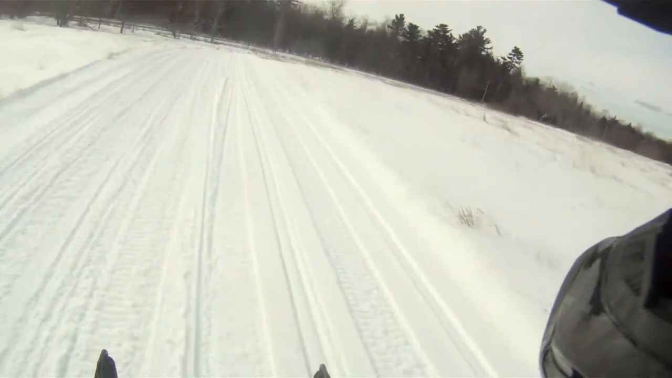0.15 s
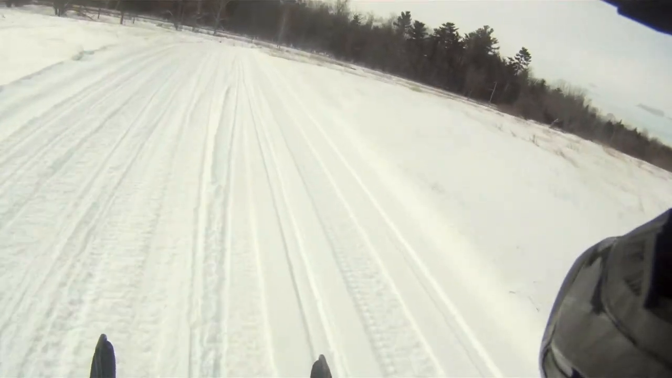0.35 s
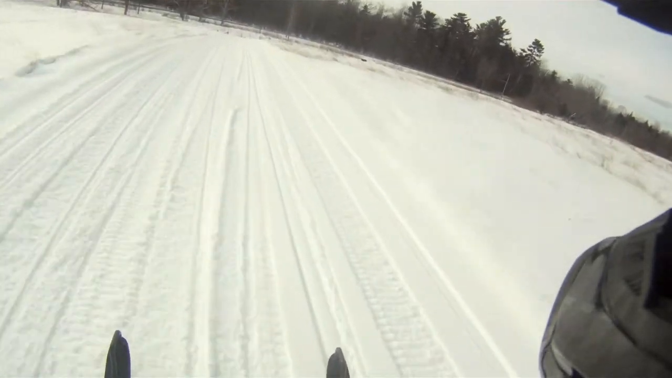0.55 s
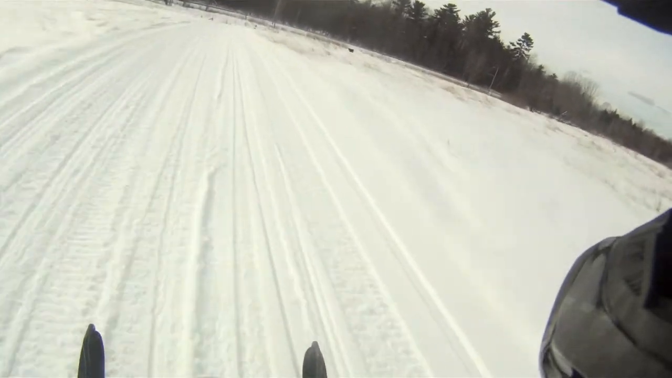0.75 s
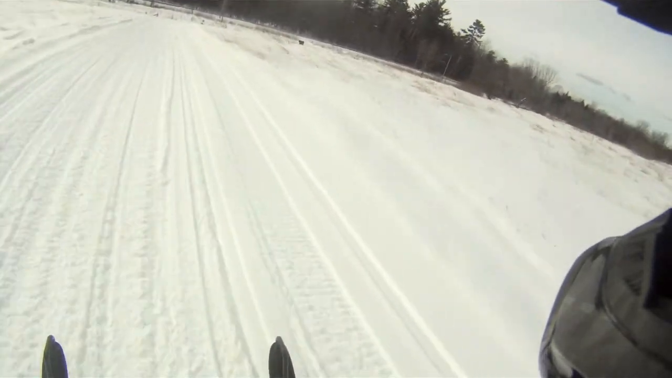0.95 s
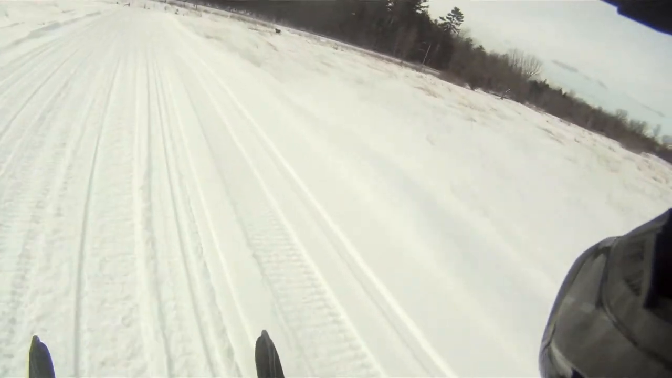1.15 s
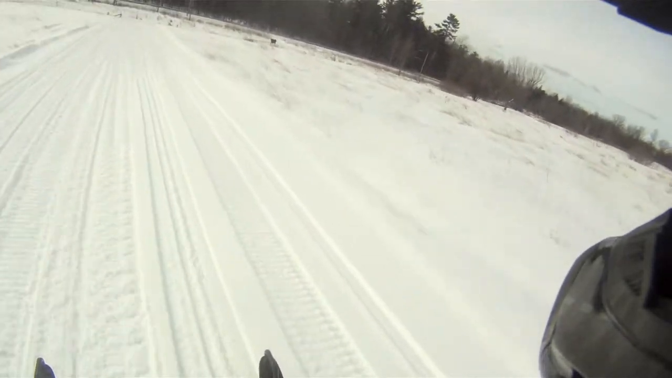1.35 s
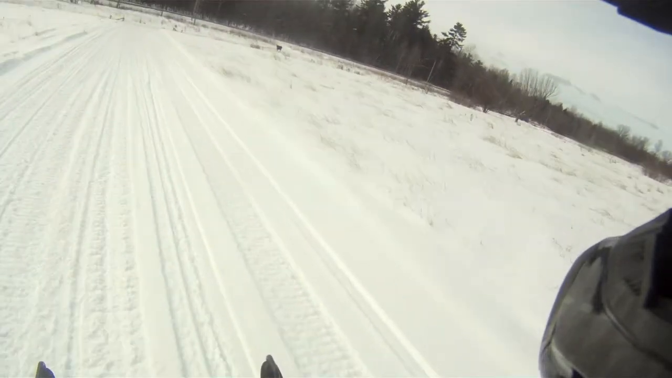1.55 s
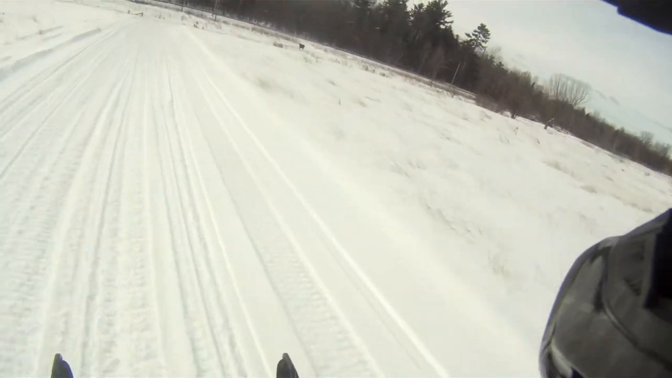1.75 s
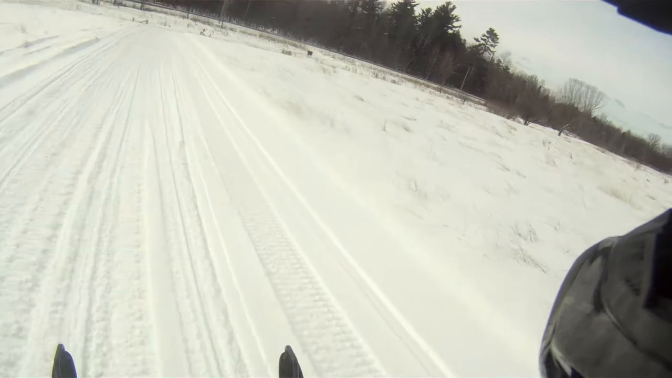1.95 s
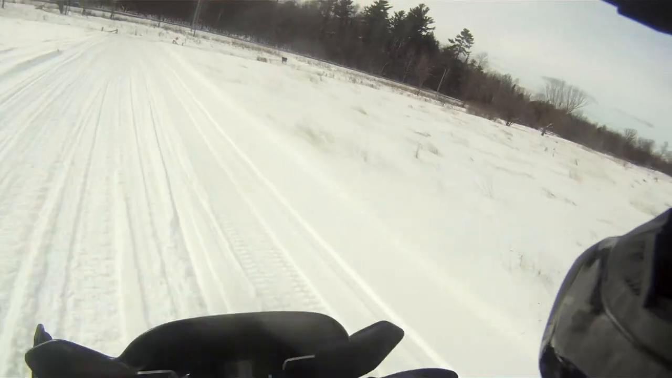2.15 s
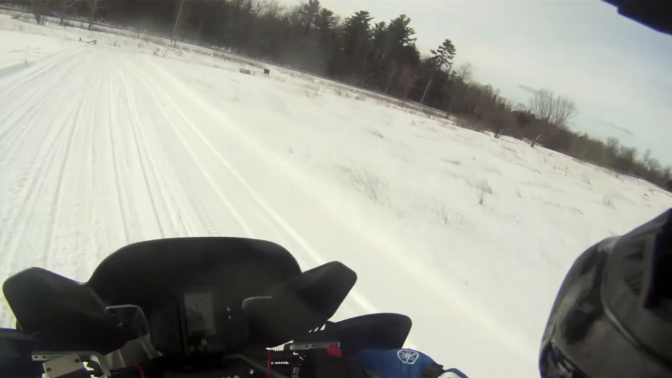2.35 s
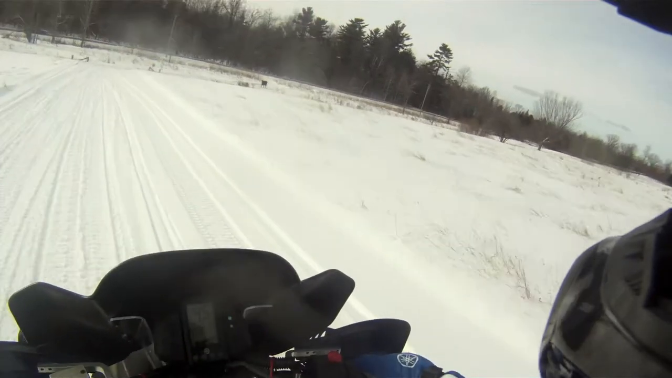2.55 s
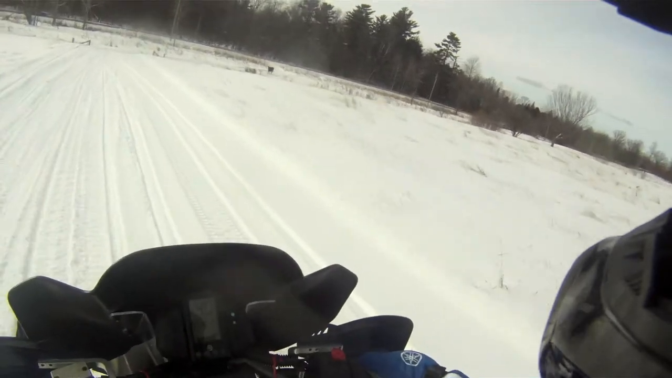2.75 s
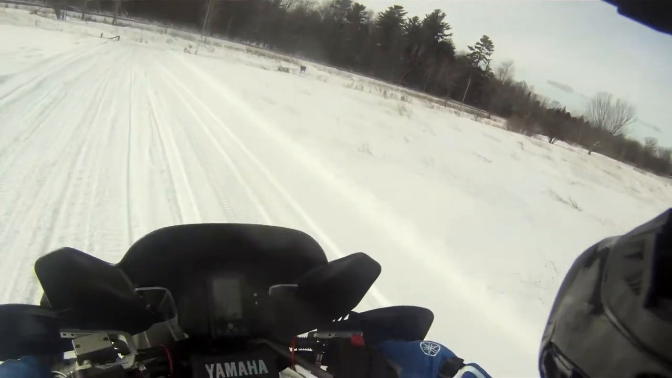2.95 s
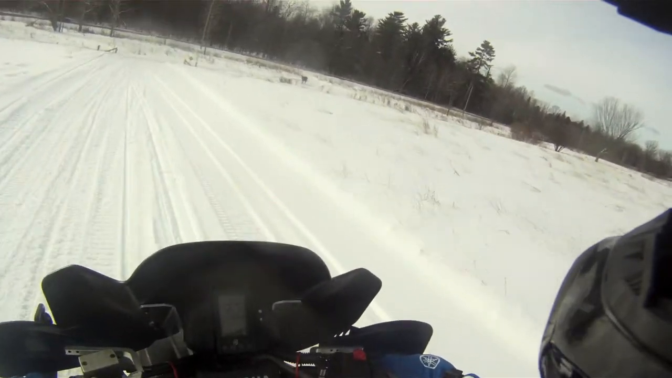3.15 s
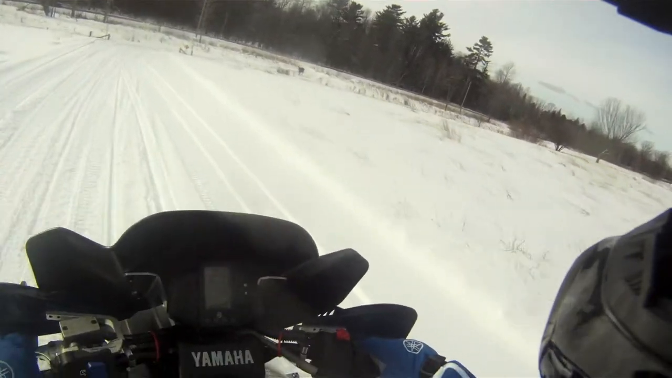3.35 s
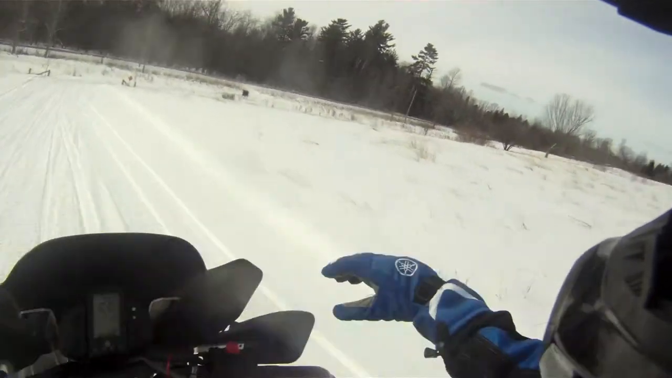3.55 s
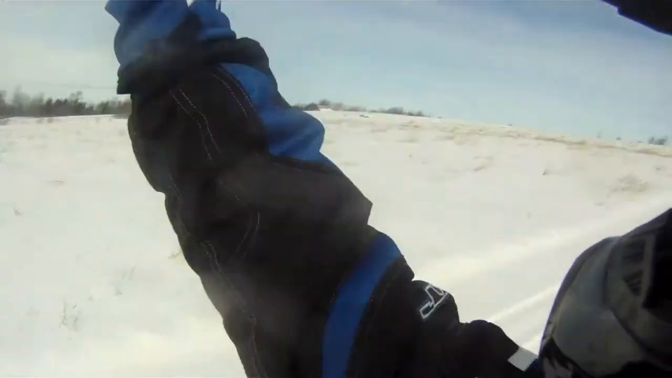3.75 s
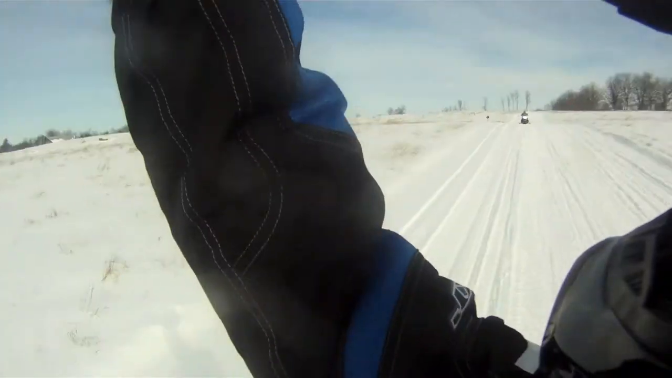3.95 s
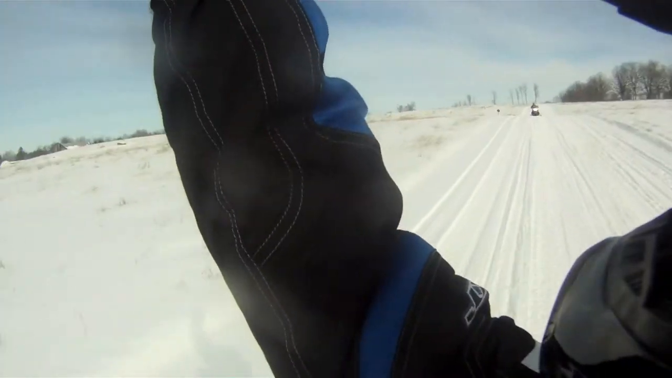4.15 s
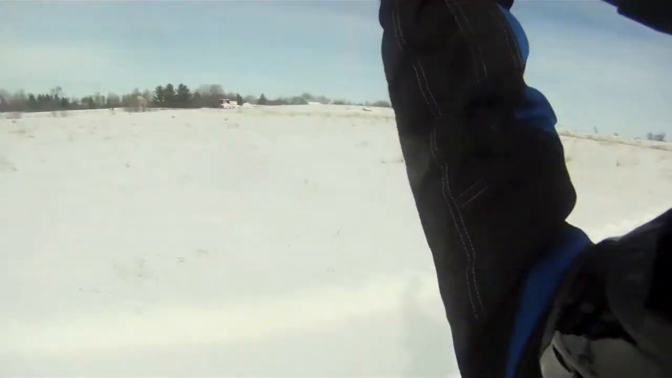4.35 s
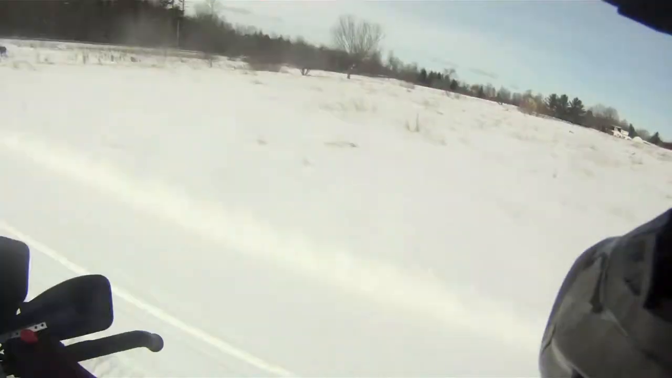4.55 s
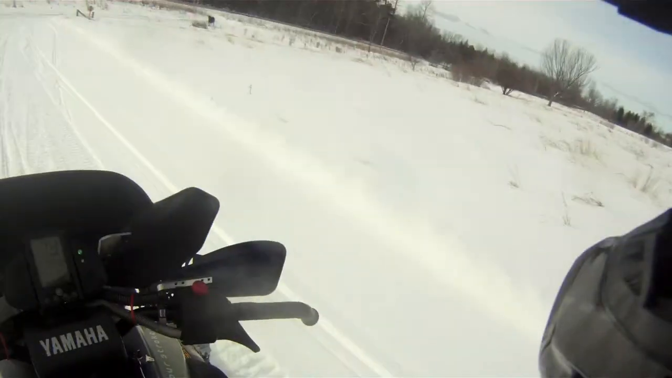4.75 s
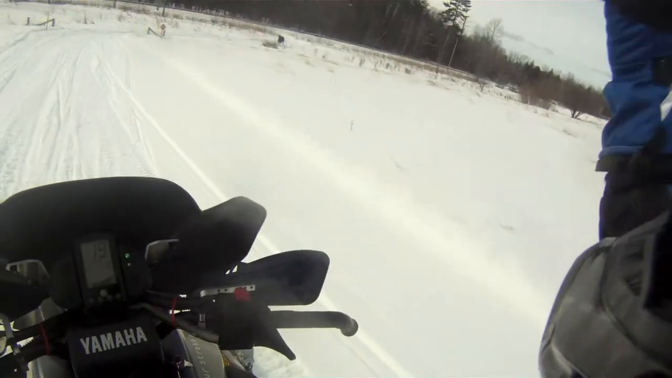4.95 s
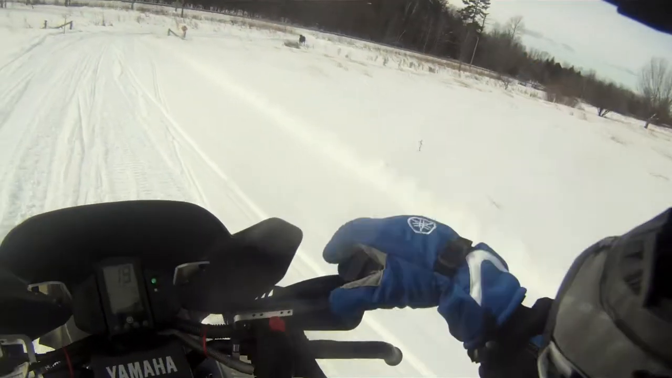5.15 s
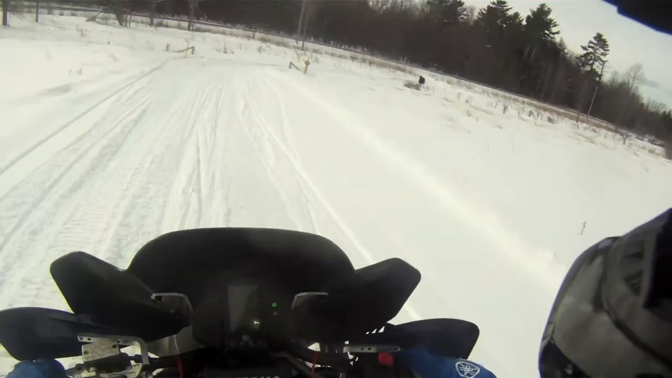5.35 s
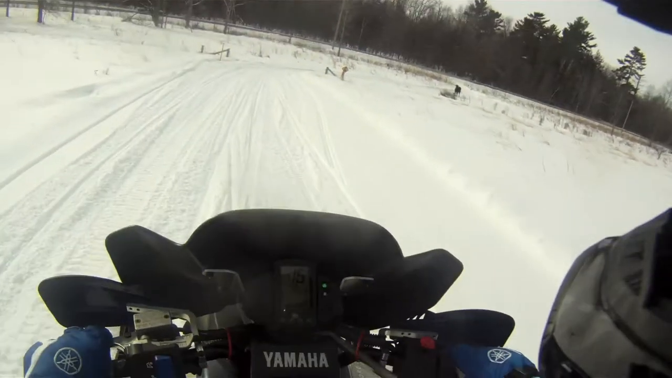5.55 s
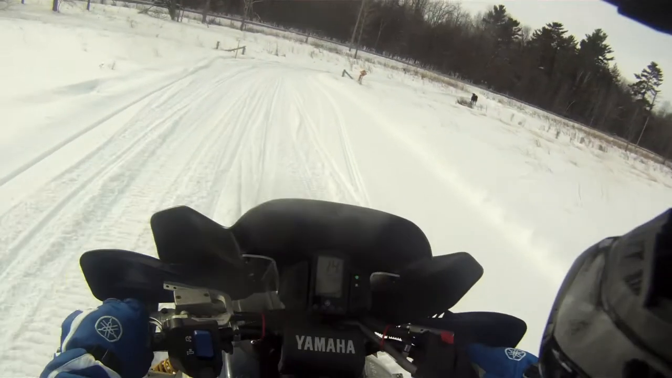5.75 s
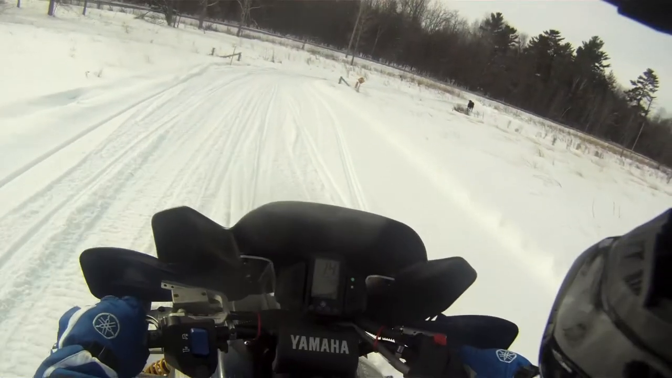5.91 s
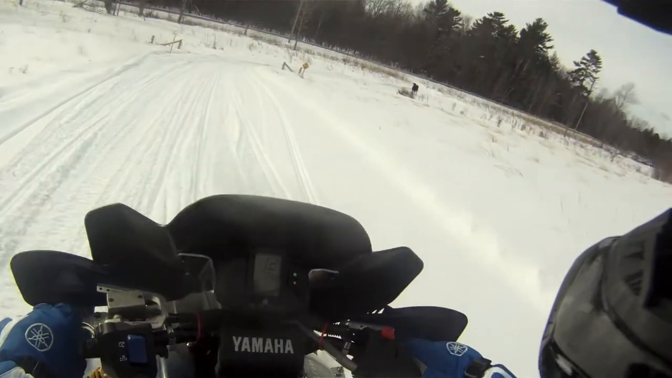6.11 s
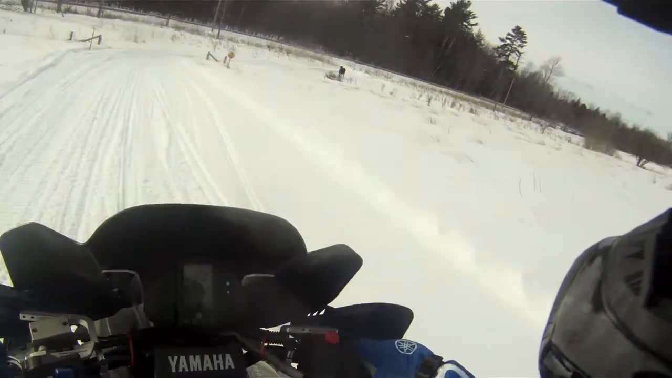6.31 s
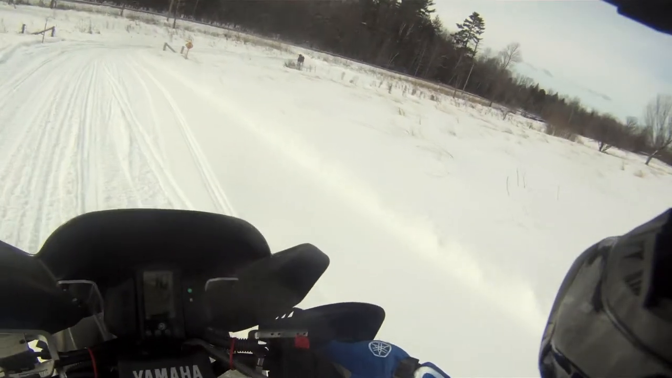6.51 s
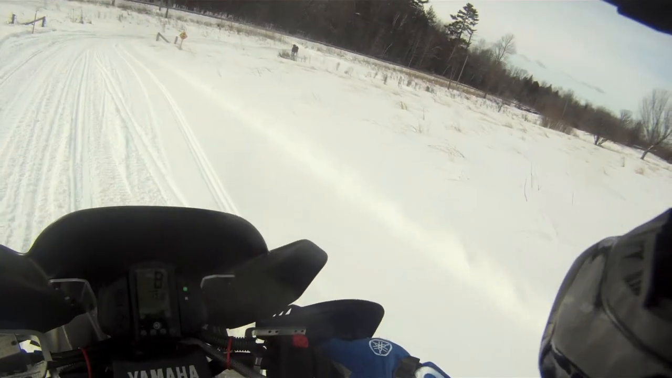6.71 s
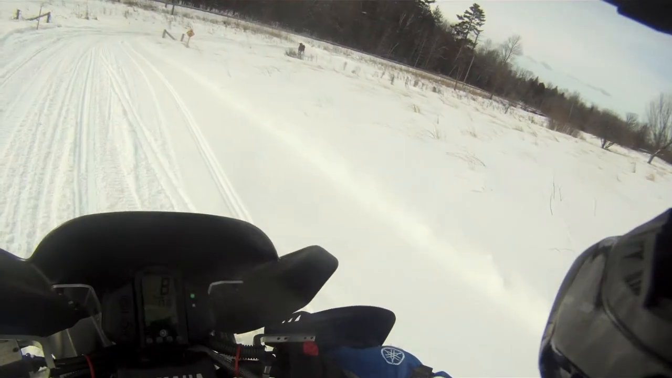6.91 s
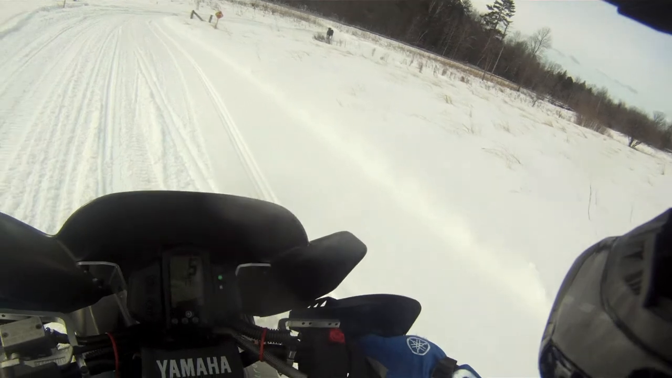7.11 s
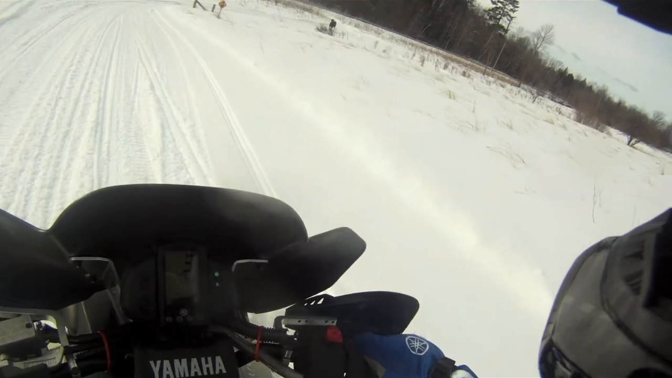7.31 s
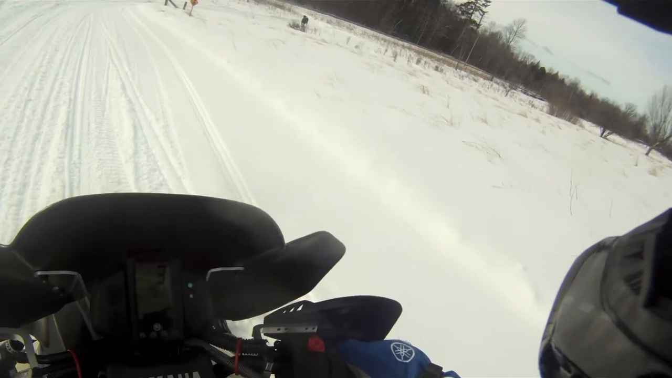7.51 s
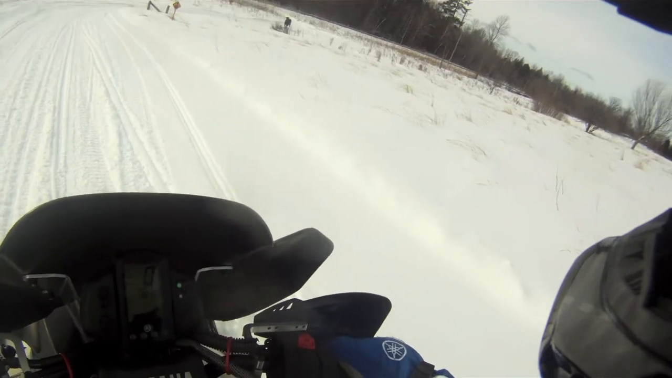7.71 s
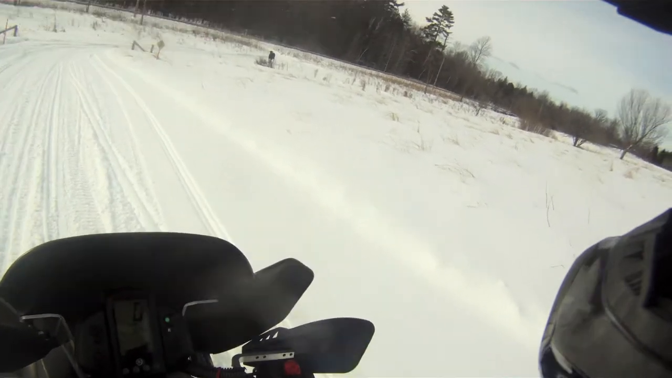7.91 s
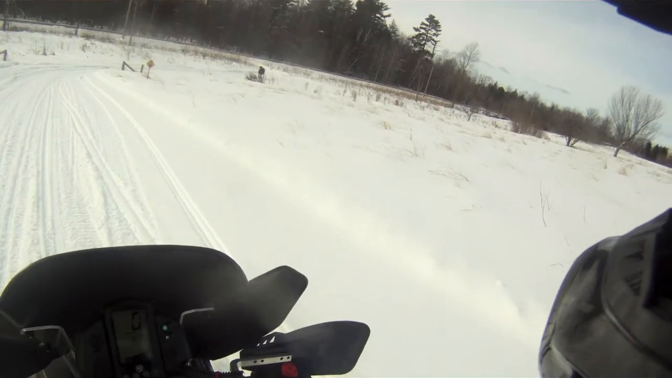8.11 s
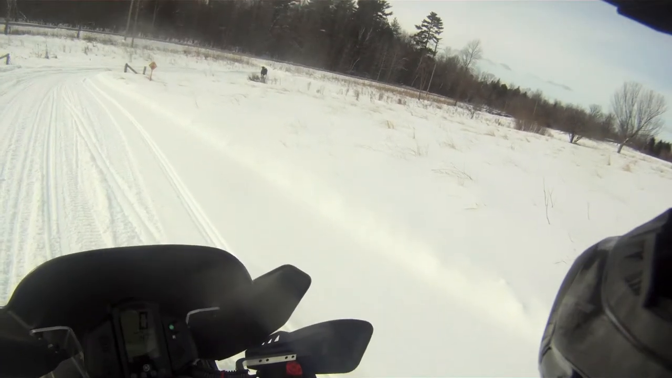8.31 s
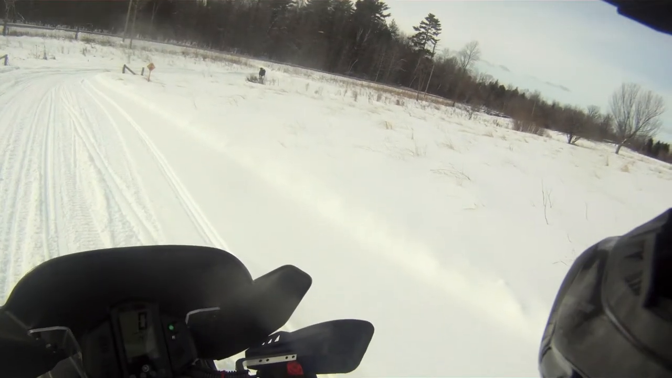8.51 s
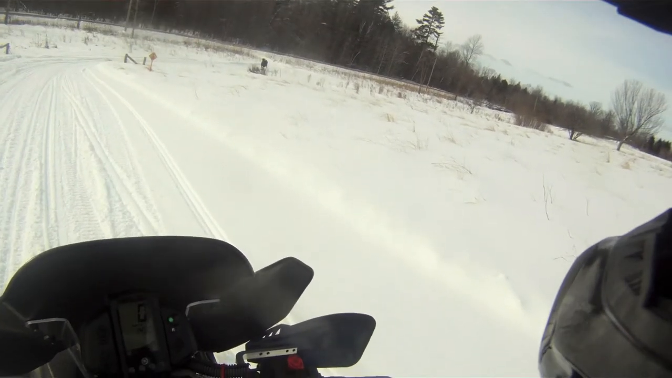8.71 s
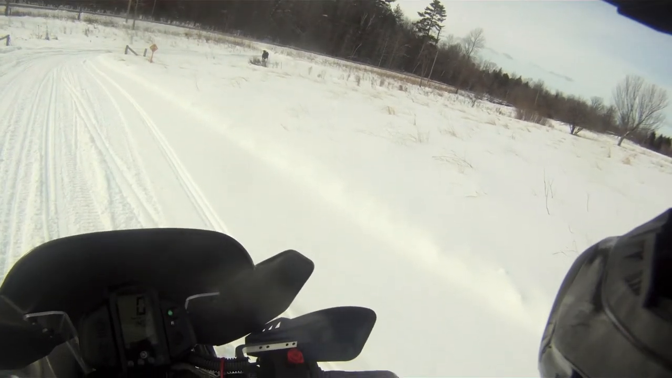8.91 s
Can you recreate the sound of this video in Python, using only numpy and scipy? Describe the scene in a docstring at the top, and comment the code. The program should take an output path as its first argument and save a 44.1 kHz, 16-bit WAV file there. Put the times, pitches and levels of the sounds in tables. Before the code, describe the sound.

A snowmobile drones over hissing snow, then slows with a falling whine and brake squeals to a chugging idle.

```python
"""Snowmobile coasting down

Heard from the rider's helmet on a packed trail, a four-stroke twin falls from a high drone to a chugging
idle while track rumble and snow hiss die away. The drive's teeth whine downwards and the brake sticks
and slips into squeals. A small camera samples it all coarsely, adding a glassy treble."""
import sys
import numpy as np
from scipy.fft import rfft, irfft, next_fast_len
from scipy.io import wavfile
from scipy.ndimage import map_coordinates

SR = 44100
rng = np.random.default_rng(int(sys.argv[2]) if len(sys.argv) > 2 else 0)


def materialize(psi):
    """Save the field psi as 16-bit PCM at rate SR to the path in sys.argv[1].

    A 1-D psi becomes a single channel; in a 2-D psi each row is a channel.
    """
    bounded = np.clip(np.atleast_2d(psi).T, -1, 1)
    quanta = np.round(bounded * 32767).astype(np.int16)
    wavfile.write(sys.argv[1], SR, quanta)


N = 399987
T = np.arange(N) / SR
CRUISE_HZ = 1000  # tooth rate of the drive at cruising speed
HOLD_HZ = 12000  # the camera's coarse sample rate

# Hood and chassis resonances. Each row: frequency in Hz, width in Hz, gain in dB.
PANELS = [(1149, 57, -4), (1430, 37, -6.5), (1546, 62, -1), (1884, 93, 0), (3043, 72, -15), (3567, 94, -13),
          (5000, 68, -15)]


def exhaust(cycle, rate, puff_s=0.00084, strongest_rate=14.8):
    """Two puffs a cycle, each led by a slight suction, echo in the pipe and ring the muffler."""
    firings = 0
    for at in (0, 0.2438):  # a 180 degree crank fires about a quarter cycle apart
        fires = np.diff(np.floor(cycle - at), prepend=np.floor(cycle[0] - at)) > 0
        firings = firings + fires * per_cycle(cycle, at, spread_db=0.5)

    def pipe(f):
        def pulse(width_s, delay_s):
            return np.exp(-2 * (np.pi * f * width_s) ** 2 - 2j * np.pi * f * delay_s)
        suction = -0.35 * pulse(puff_s, -0.0022)
        inverted_echo = -0.7 * pulse(0.00107, 0.00476)
        upright_echo = 0.22 * pulse(2 * puff_s, 0.01763)
        return suction + pulse(puff_s, 0) + inverted_echo + upright_echo

    strength = amp(-31 - 10 * np.abs(octaves(rate, strongest_rate)))
    puffs = filtered(firings * strength, pipe) * puff_s * SR * np.sqrt(2 * np.pi)
    puffs = puffs * (1 + 0.23 * wobble(500))  # turbulence in the gas
    # The outlet radiates little below 45 Hz.
    puffs = filtered(puffs, lambda f: -f * f / (45 ** 2 - f * f + 1j * f * 19))
    return puffs + ring(puffs, [(112.4, 14, -4), (189, 20, -0.5), (233, 26, -3), (316, 33, 3)])


def drone(cycle, rate, full_rate=41.3):
    """At speed the firings merge into strong orders that shift off throttle and fade with the revs."""
    # Exhaust orders. Each row: multiple of the cycle rate, dB on throttle, dB coasting.
    orders = [(1, -42, -51), (2, -60.5, -45), (3, -70, -36), (4, -36, -37), (5, -43.5, -58),
              (7, -62, -51.5), (8, -48, -50)]
    # Muffler resonances that lift a passing order. Each row: centre in Hz, width in Hz, lift in dB.
    muffler = [(121, 11, 4.5), (202.4, 27, 4.5), (313, 2.5, 11.5)]
    coasting = ramp(at_s=1.45, length_s=0.11)
    fade_db = 25 * np.minimum(octaves(rate, full_rate), 0)
    crank = cycle + 0.0025 * wobble(24)
    out = 0
    for order, throttle_db, coast_db in orders:
        lift_db = sum(db * np.exp(-((order * rate - hz) / width) ** 2) for hz, width, db in muffler)
        level_db = throttle_db + (coast_db - throttle_db) * coasting + fade_db + lift_db
        out = out + amp(level_db + 0.44 * wobble(14)) * np.cos(2 * np.pi * order * crank)
    return np.sqrt(2) * out


def engine_bay(cycle, rate, tooth_hz, idle_db=-37, fast_db=-29, fast_rate=60):
    """Each combustion shakes hood and chassis just before its puff; the chug deepens as the sled slows."""
    # One burst of clatter per cylinder. Each row: start, rise and fall in cycles, level in dB.
    bursts = [(-.195, 0.038, 0.45, -6.5), (0.03, 0.075, 0.15, -7.5)]
    # Spells of harder clatter. Each row: start in seconds, length in seconds, lift in dB.
    jolts = [(2.22, 0.48, 2), (3.643, 0.075, 3.5), (6.214, 1.28, 2)]
    # The rattle's bright spectrum. Each row: frequency in Hz, relative level in dB.
    rattle_eq = [(200, -34), (600, -13.5), (800, -26), (1050, -31), (1290, -43), (1450, 16.5), (1720, 9),
                 (2050, -43), (2400, 3.5), (3200, 7.5), (3700, -6), (4300, -11), (5200, 1), (6000, -10.5)]
    body_eq = [(300, -34), (700, 4.5), (1050, 4), (3600, 1.5), (4200, -0.5), (5200, -5.5), (6000, -15)]
    shake = 0
    for start, rise, fall, db in bursts:
        age = since(cycle, start)
        envelope = (1 - np.exp(-(age / rise) ** 2)) * np.exp(-age / fall)
        shake = shake + amp(db) * per_cycle(cycle, start, spread_db=0.6) * envelope
    fill = 0.54 * np.tanh(tooth_hz / 416)  # at speed, rattle fills the gaps between bursts
    clatter = noise() * np.hypot(shake, fill) * amp(2 * wobble(700))
    body = colour(ring(clatter, PANELS), body_eq)
    level_db = np.maximum(idle_db, fast_db + 5.5 * octaves(rate, fast_rate))
    level_db = level_db + sum(db * spell(start, length) for start, length, db in jolts)
    return amp(level_db) * (amp(-2) * body + amp(-6.5) * colour(clatter, rattle_eq))


def knock(cycle, start_cycles=-0.185, fall_cycles=0.055):
    """The first combustion of each cycle knocks on the lowest panel, never twice alike."""
    decay = np.exp(-since(cycle, start_cycles) / fall_cycles)
    blows = noise() * per_cycle(cycle, start_cycles, spread_db=4) * decay
    panel = ring(blows, [(1140, 63, 0)])
    return amp(-54) * unit(ring(panel, [(1136, 220, 0)]))


def drive(cycle, tooth_hz):
    """The drive's teeth whine downwards; under braking their overtones rasp in the chassis and squeal."""
    # How strongly the chassis radiates the whine. Each row: tooth rate in Hz, level in dB.
    radiation = [(60, -97), (190, -63), (370, -61), (510, -51), (610, -46.5), (655, -39.5), (765, -40),
                 (860, -44), (1000, -68)]
    # Overtones of the teeth. Each row: multiple of the tooth rate, relative level in dB.
    teeth = [(2, 3), (3, 2.5), (4, 0), (5, -6.5), (6, -8), (7, -6), (8, 3), (9, 0), (12, 4.5), (16, -2)]
    rasp_eq = [(300, 2), (700, -13.5), (1100, -38), (2600, 3.5), (3600, 2), (4150, -8.5), (6000, -6.5)]
    hz = tooth_hz * (1 + 0.008 * wobble(130) + 0.0095 * np.sin(2 * np.pi * cycle))
    whine_db = np.interp(tooth_hz, *np.transpose(radiation)) + 4.4 * wobble(50) + 1.2 * wobble(12)
    whine = amp(whine_db) * tone(hz * (1 + 0.016 * wobble(400)))
    scraping_hz = hz * (1 + 0.035 * wobble(450))
    overtones = sum(amp(db) * tone(k * scraping_hz) * (k * hz < HOLD_HZ / 2) for k, db in teeth)
    overtones = overtones * amp(3.2 * wobble(60))
    rasp = unit(ring(overtones, PANELS)) + amp(2.5) * colour(overtones, rasp_eq)
    braking = ramp(at_s=1.8, length_s=0.56) * amp(-34.5 + 9 * octaves(tooth_hz, CRUISE_HZ))
    return whine + braking * unit(rasp) + squeals(hz)


def squeals(tooth_hz, jitter=0.01585):
    """The brake sticks and slips on single overtones of the tooth rate, rough in pitch and level."""
    # Brake squeals. Each row: start in seconds, length in seconds, overtone number, level in dB.
    cues = [(2.254, 0.13, 2, -33.5), (2.613, 0.23, 3, -38), (3.7, 0.053, 4, -39.5), (3.894, 0.6, 8, -45.5),
            (4.307, .04, 5, -36.5), (4.328, 0.077, 2, -48), (5.02, 0.14, 2, -54), (4.333, 0.26, 4, -34.5),
            (4.35, 0.14, 8, -41.5), (4.54, 0.31, 8, -42.5), (4.52, 0.28, 4, -32.5), (4.85, 0.12, 4, -36.5),
            (5.0, 0.25, 8, -45), (5.01, 0.21, 4, -44.5), (5.15, 0.26, 5, -45), (5.315, 0.16, 4, -34.5),
            (5.555, 0.18, 4, -41.5), (5.713, 0.317, 8, -44.5), (5.747, 0.77, 4, -53.5),
            (6.72, 0.33, 4, -62)]
    out = 0
    for order in sorted({row[2] for row in cues}):
        gain = spells([(start, length, db) for start, length, k, db in cues if k == order])
        flutter = amp(3.17 * wobble(55) + 0.97 * wobble(260))
        out = out + gain * flutter * tone(order * tooth_hz * (1 + jitter * wobble(700)))
    return out


def howl(cycle, floor_db=-61.5, throb_db=1):
    """Friction in the drive keeps one narrow chassis resonance ringing, throbbing with the crank."""
    # Flare-ups of the howl. Each row: start in seconds, length in seconds, level in dB.
    flares = [(2.45, 0.88, -35.5), (3.14, 0.057, -33), (3.34, 0.33, -36), (4.08, .18, -41)]
    band = ring(noise(), [(1550, 68, 0)])
    ringing = unit(ring(band, [(1560, 150, 0)]))
    throb = amp(throb_db * np.cos(2 * np.pi * cycle))
    return np.hypot(spells(flares), amp(floor_db)) * throb * ringing


def snow(tooth_hz, hiss_db=-25, crunch_db=-50):
    """Skis and track scrape packed snow: a grainy hiss sinks to a slow crunch, with a sizzle on top."""
    # Spectrum of scraped snow. Each row: frequency in Hz, relative level in dB.
    snow_eq = [(300, -38), (640, -23.5), (950, -8.5), (1140, 4.5), (1320, -2.5), (1520, -1), (1720, -2.5),
               (2080, 2.5), (2480, -5.5), (3050, -6), (3620, -9), (4050, -21.5), (5150, -12), (6000, -25)]
    # Spells of thin sizzle. Each row: start in seconds, length in seconds, level in dB.
    sizzles = [(2.2, 0.26, -51), (3.63, 0.26, -47.5), (4.3, 0.73, -49), (5.05, 0.6, -51.5), (5.65, .6, -53)]
    sizzle_eq = [(3000, -37), (4250, -22), (4500, 0), (5000, 3), (5400, -1), (6000, -19)]
    pace = octaves(tooth_hz, CRUISE_HZ)
    level = np.hypot(amp(hiss_db + 15.5 * pace), amp(crunch_db + 0.8 * pace))
    grains = noise() * amp(0.44 * wobble(900) + 0.37 * wobble(60) + 0.43 * wobble(8.2))
    sizzle = colour(noise() * amp(2.3 * wobble(120)), sizzle_eq)
    return level * colour(grains, snow_eq) + spells(sizzles) * sizzle


def track(tooth_hz, teeth_per_lug=5):
    """The track rumbles over its wheels and drums when slack; its lugs slap the trail in a sinking hum."""
    # Rumble of track and suspension. Each row: frequency in Hz, relative level in dB.
    rumble_eq = [(18, -24), (45, 0.5), (80, -4), (130, 1), (240, 2), (340, 0.5), (470, -4), (620, -8.5),
                 (1000, -9.5), (3000, -28)]
    # The slack track hits the chassis. Each row: start in seconds, length in seconds, level in dB.
    slack = [(3.32, 0.56, -37.5), (4.03, 0.18, -62)]
    drum_eq = [(70, -16), (105, -2), (125, -2), (145, -10), (185, -6), (260, -24), (600, -70)]
    pace = octaves(tooth_hz, CRUISE_HZ)
    rumble = amp(-34 + 6 * pace + 0.8 * wobble(20)) * colour(noise(), rumble_eq)
    lugs = tone(tooth_hz / teeth_per_lug * (1 + 0.0117 * wobble(16)))
    drumming = spells(slack) * colour(noise(), drum_eq)
    return rumble + drumming + amp(-44.5 + 10 * pace + 1.2 * wobble(21)) * lugs


def wind():
    """Low, lumpy buffeting on the microphone while the helmet is turned across the airflow."""
    # Wind buffets. Each row: start in seconds, length in seconds, level in dB.
    buffets = [(3.62, .6, -45.5)]
    gusts = noise() * amp(3 * wobble(13))
    return spells(buffets) * colour(gusts, [(15, -12), (35, -5), (70, 0), (160, -16), (500, -60)])


def amp(db):
    """Decibels to gain."""
    return 10 ** (np.asarray(db) / 20)


def unit(x):
    """Scale to rms 1."""
    return x / np.sqrt(np.mean(x ** 2) + 1e-20)


def octaves(speed, reference):
    """How many octaves a speed lies above its reference."""
    return np.log2(speed / reference)


def noise():
    """White noise."""
    return rng.standard_normal(N)


def tone(hz):
    """A sine of rms 1 that follows a pitch curve."""
    return np.sqrt(2) * np.sin(2 * np.pi * (np.cumsum(hz) / SR + rng.random()))


def wobble(rate):
    """A smooth random curve, rate knots a second."""
    return map_coordinates(rng.standard_normal(int(N * rate / SR) + 4), [T * rate])


def filtered(x, response):
    """x through a frequency response."""
    size = next_fast_len(N + SR // 2)
    return irfft(rfft(x, size) * response(np.fft.rfftfreq(size, 1 / SR)), size)[:N]


def colour(x, points):
    """x through an EQ curve of (Hz, dB) points, at rms 1."""
    f, db = np.transpose(points)
    return unit(filtered(x, lambda hz: amp(np.interp(np.log(hz + 1), np.log(f), db))))


def ring(x, modes):
    """x through (Hz, width Hz, dB) resonances."""
    return filtered(x, lambda f: sum(amp(db) * 1j * f * width / (hz * hz - f * f + 1j * f * width)
                                     for hz, width, db in modes))


def since(cycle, start):
    """Share of a cycle gone by since the crank passed start."""
    return (cycle - start) % 1


def per_cycle(cycle, start, spread_db):
    """A new random gain each time the crank passes start."""
    gains = amp(spread_db * rng.standard_normal(1024))
    return gains[np.floor(cycle - start).astype(int) % 1024]


def ramp(at_s, length_s):
    """A smooth step from 0 to 1 around a moment."""
    return 0.5 + 0.5 * np.tanh(2 * (T - at_s) / length_s)


def spell(start, length, attack_s=0.01, release_s=0.064):
    """Attack, hold and release of one spell of sound."""
    attack = np.clip((T - start) / attack_s, 0, 1)
    return attack * np.exp(-np.maximum(T - start - length, 0) / release_s)


def spells(rows, sag_db_per_s=3.5):
    """Joint envelope of (start s, length s, dB) spells, each sagging while it lasts."""
    gains = (spell(start, length) * amp(db - sag_db_per_s * np.maximum(T - start, 0))
             for start, length, db in rows)
    return np.sqrt(sum(gain ** 2 for gain in gains))


def scene():
    """Engine, running gear and snow follow the revs and the sled's speed, all close to the helmet."""
    # Engine speed. Each row: time in seconds, four-stroke cycles per second.
    revs = [(0, 63.2), (.19, 62.8), (.33, 61.2), (1.15, 56.7), (1.4, 56), (1.6, 52.1), (2.15, 46.8),
            (2.4, 42.7), (3.46, 31.5), (4.67, 14.21), (5.08, 14.7), (6.33, 14.61), (6.43, 14.24),
            (7.21, 14.56), (7.7, 11.81), (7.95, 12.25), (9.07, 11.58)]
    # Sled speed. Each row: time in seconds, tooth rate of the track drive in Hz.
    travel = [(0, 1242), (1.4, 1032), (2.05, 859), (2.42, 689), (2.8, 592), (3.2, 534), (3.6, 501.4),
              (3.9, 416.2), (4.28, 416.4), (4.42, 338.5), (4.58, 374.4), (4.82, 366), (5.0, 329.5),
              (5.35, 294.4), (5.65, 249), (6.05, 218.3), (7.45, 58.2)]
    rate = np.interp(T, *np.transpose(revs))
    tooth_hz = np.interp(T, *np.transpose(travel))
    cycle = np.cumsum(rate) / SR
    cycle = cycle - np.interp(7.067, T, cycle)  # a puff lands at 7.067 s
    engine = exhaust(cycle, rate) + drone(cycle, rate) + engine_bay(cycle, rate, tooth_hz) + knock(cycle)
    return (engine + snow(tooth_hz) + track(tooth_hz) + drive(cycle, tooth_hz) + howl(cycle) + wind())[None]


def record(dry):
    """The camera holds each coarse sample, which mirrors the sound into a glassy treble."""
    def hold_droop(hz):
        return np.sinc(hz / HOLD_HZ) * amp(np.interp(hz, [6000, 10000], [0, 0.5]))

    narrow = filtered(dry[0], lambda hz: np.clip((HOLD_HZ / 2 - hz) / 220 + 0.33, 0, 1))
    mirrored = narrow * (1 + 2 * np.cos(2 * np.pi * HOLD_HZ * T))
    held = filtered(mirrored, hold_droop)
    hiss = amp(-66) * noise()
    return filtered(held + hiss, lambda hz: hz < 15450)[None]


dry = scene()
out = record(dry)
materialize(out)
```